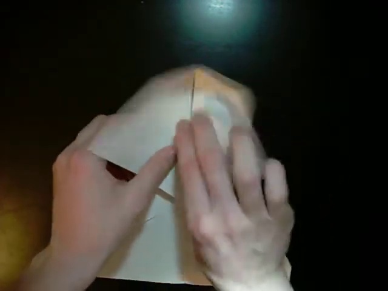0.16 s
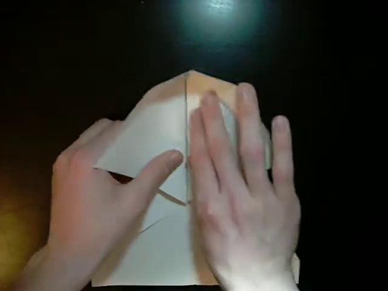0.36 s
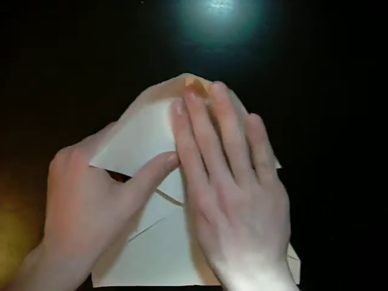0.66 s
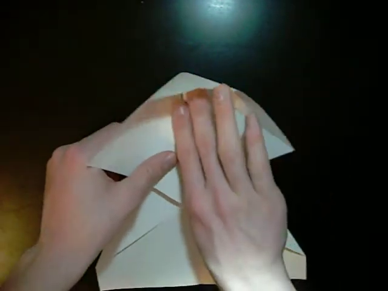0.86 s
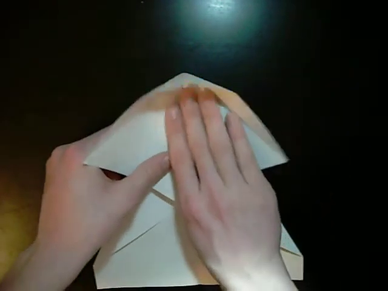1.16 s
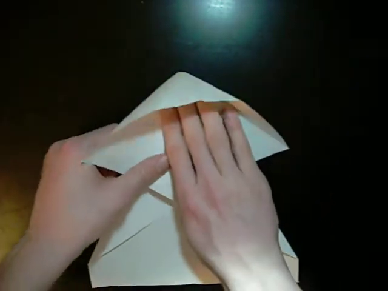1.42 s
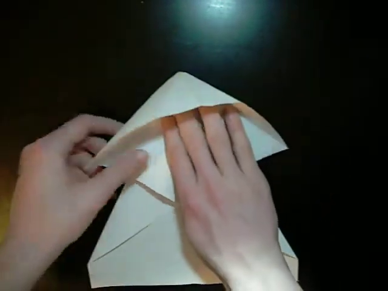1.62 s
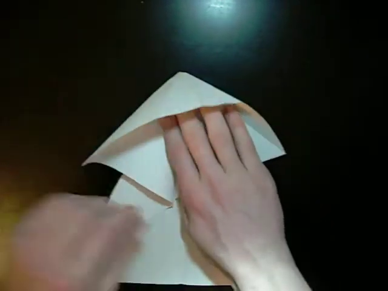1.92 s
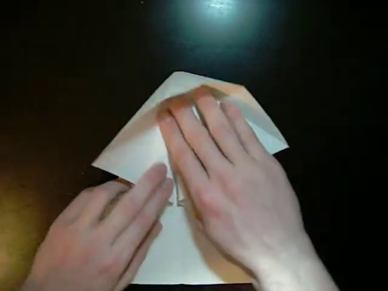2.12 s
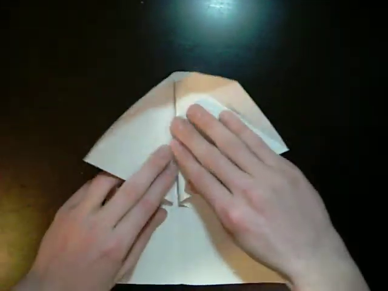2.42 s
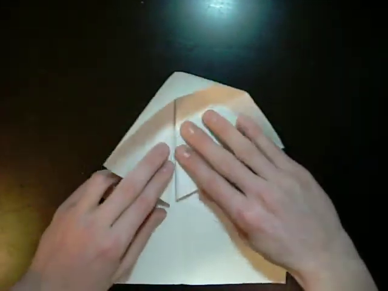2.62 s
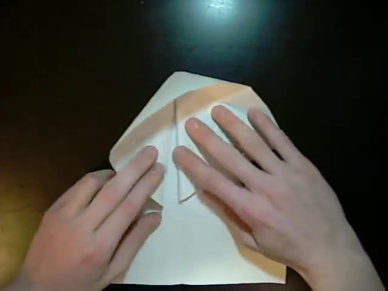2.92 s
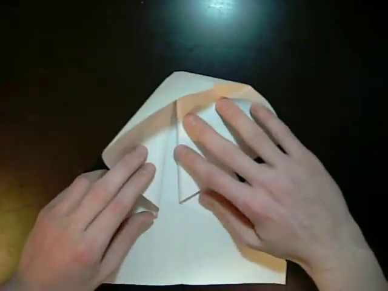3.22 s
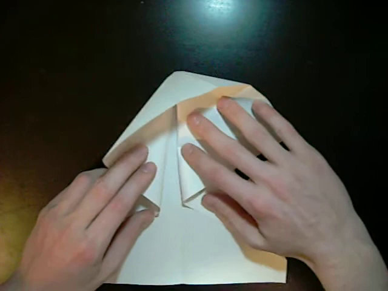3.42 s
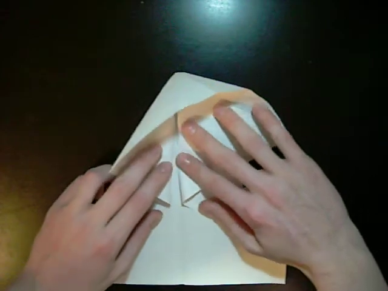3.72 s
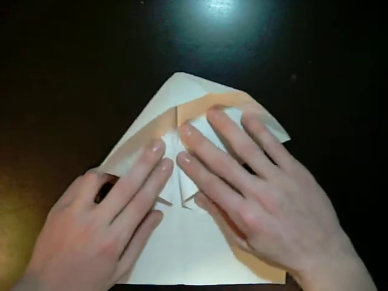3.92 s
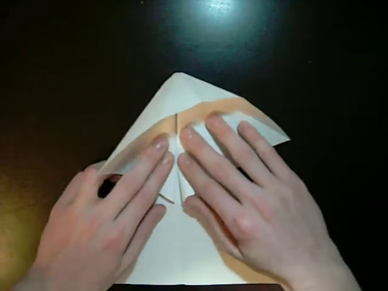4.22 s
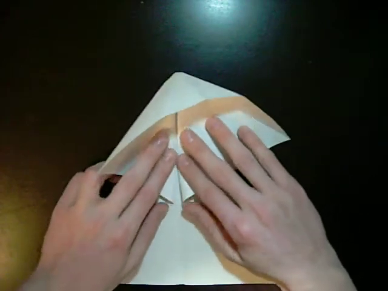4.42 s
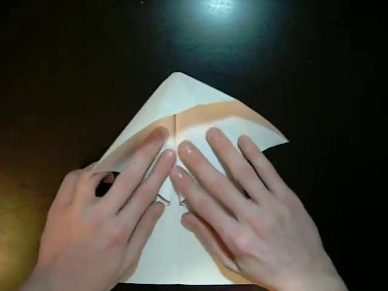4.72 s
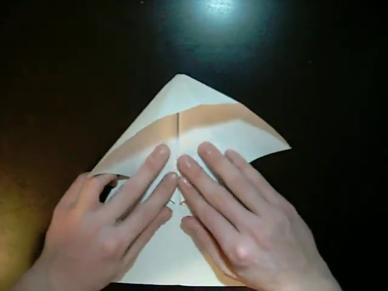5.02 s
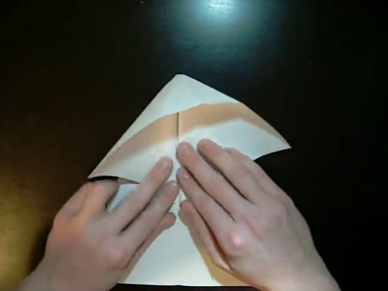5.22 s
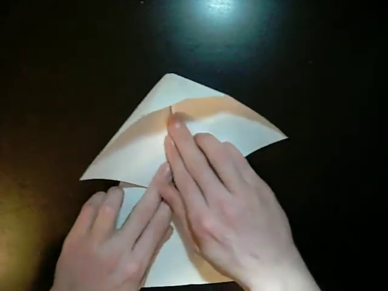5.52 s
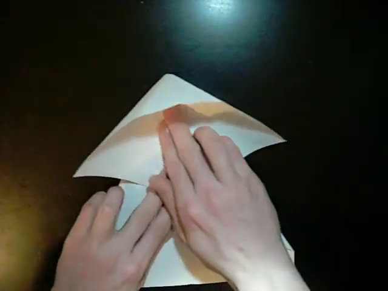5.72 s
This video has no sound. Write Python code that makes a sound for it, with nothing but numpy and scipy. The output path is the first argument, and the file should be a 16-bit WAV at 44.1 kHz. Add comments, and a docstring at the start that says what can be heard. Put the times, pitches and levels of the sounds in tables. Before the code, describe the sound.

A stiff sheet is folded on a desk: brief rustling rubs, skidding flaps, and bright crease clicks with slight ringing. The loudest pair of snaps comes about a quarter of the way in, clipping harshly with a small thump; another sharp cluster comes two thirds through. Between them are faint finger strokes. Dry small room, close low-quality microphone lacking high treble, faint hum and buzz beneath.

```python
"""At a desk in a small room, two hands fold a sheet of paper close to a narrow-band webcam microphone.
Sliding fingers and paper layers hiss: dense random stick-slip clicks, coloured and shaped by each stroke.
Flaps scuff in short swells of such clicks; creases buckle in sharp snaps, each a click, a bounce and a ring.
Decaying low modes pat the desk and one puff of air thumps; the hardest snaps overload the microphone.
A faint hiss, mains hum and frame-rate buzz lie under everything."""
import sys
import numpy as np
from scipy import signal
from scipy.fft import rfft, irfft, next_fast_len
from scipy.io import wavfile

SR = 44100
rng = np.random.default_rng(int(sys.argv[2]) if len(sys.argv) > 2 else 0)


def store_wav(level_fs):
    """Save 16-bit WAV to argv[1]."""
    pcm = np.round(np.clip(np.atleast_2d(level_fs), -1, 1) * 32767)
    wavfile.write(sys.argv[1], SR, pcm.T.astype(np.int16))


N = 258426  # length of the scene in samples

# spectrum of the fine hiss of sliding paper: frequency_hz [Hz], density_db [relative dB per Hz]
HISS_SPECTRUM = [(500, -30.5), (900, -29.5), (1300, -16.5), (1700, -10), (2200, -6), (2900, 1.5),
                 (3700, 2.5), (4100, -0.5), (4500, -6.5), (5200, -25), (7000, -71)]
# spectrum of the sheet's body shaken by the rub: frequency_hz [Hz], density_db [relative dB per Hz]
BODY_SPECTRUM = [(120, -16.5), (250, -14.5), (480, -2), (700, -4), (1100, -2.5), (1400, 4.5), (2200, 0.5),
                 (4000, -20.5)]
HISS_DB, TICKS_DB, BODY_DB = -1.5, -16, 0.5  # balance of the three parts


def rubbing():
    """Stick-slip friction: dense slips and sparse ticks of catching fibres flutter under uneven pressure."""
    rub, shake = sliding()

    hiss = unit(colour(slips(N, per_s=7000, spread_db=2.0), HISS_SPECTRUM))
    ticks = unit(colour(slips(N, per_s=190, spread_db=0.5), SNAP_SPECTRUM))
    body = unit(colour(slips(N, per_s=6300, spread_db=2.0), BODY_SPECTRUM))

    surface = rub * (amp(HISS_DB) * hiss + amp(TICKS_DB) * ticks)
    pressure = wander(hz=147.8, depth_db=2.05)
    return (surface + shake * amp(BODY_DB) * body) * pressure


# strokes of fingers and paper layers sliding: start_s [s], length_s [s], level_db [dB],
# body_db [dB relative to the level, body of the sheet, mostly 0.5 to 2.5 kHz]
SLIDING_STROKES = [(-0.015, 0.03, -23.5, -15.5), (0.083, 0.14, -37, -12), (0.252, .032, -36, -8.5),
                   (0.29, 0.086, -34.5, -13), (0.404, .03, -32, -20), (0.446, 0.056, -41, -12.5),
                   (0.51, 0.055, -31.5, -12.5), (0.636, 0.021, -35.5, -20), (0.694, 0.0303, -42, -20),
                   (0.919, 0.057, -40.5, 4), (0.99, 0.022, -34.5, -21), (1.132, 0.065, -37.5, -12.5),
                   (1.202, 0.092, -41, -16), (1.38, .09, -34, -19.5), (1.516, 0.14, -33, -21),
                   (1.671, 0.052, -39, -19), (1.706, 0.047, -36.5, -13.5), (1.773, 0.018, -38.5, -12.5),
                   (1.83, .022, -44, -15.5), (1.884, 0.056, -43, -12), (1.957, 0.13, -36.5, -15.5),
                   (2.085, 0.12, -38, -19.5), (2.198, 0.22, -41, -15.5), (2.43, 0.13, -38.5, -14.5),
                   (2.569, 0.054, -44.5, -11), (2.647, 0.064, -36.5, -21), (2.772, 0.19, -38.5, -12.5),
                   (2.996, 0.066, -38.5, -17), (3.273, 0.085, -41.5, -36), (3.452, 0.081, -44.5, -22),
                   (3.496, 0.098, -36, -15.5), (3.587, 0.14, -45, -9), (3.743, 0.12, -44, -18),
                   (3.886, 0.047, -42.5, -29), (3.968, 0.072, -37, -6), (4.145, 0.072, -38, -31),
                   (4.213, 0.084, -34.5, -20), (4.442, 0.11, -36.5, -16), (4.599, 0.11, -42.5, -16),
                   (4.707, 0.25, -37, -31), (5.097, 0.14, -39, -26.5), (5.251, 0.25, -38, -20),
                   (5.522, 0.21, -38.5, -27.5), (5.742, 0.158, -38.5, -16.5)]
# hands resting and shifting on the sheet between strokes: time_s [s], level_db [dB]
RESTING_HANDS = [(0, -51), (.5, -46.5), (.85, -58), (1.05, -49), (1.6, -43), (1.87, -64), (2.1, -46.5),
                 (2.8, -44), (3.2, -57), (3.42, -59.5), (4.1, -43.5), (4.4, -47), (5, -49), (5.8, -43)]
RESTING_BODY_DB = -15.5  # relative to the resting level


def sliding():
    """Incoherent addition: strokes and resting hands add in power, for the rub and for the sheet's body."""
    t = np.arange(N) / SR
    rub_power = amp(np.interp(t, *np.transpose(RESTING_HANDS))) ** 2
    body_power = rub_power * amp(RESTING_BODY_DB) ** 2
    for start, length, level_db, body_db in SLIDING_STROKES:
        power = (amp(level_db) * stroke(start, length)) ** 2
        rub_power = rub_power + power
        body_power = body_power + power * amp(body_db) ** 2
    return np.sqrt(rub_power), np.sqrt(body_power)


GRIP_S, RELEASE_S = 0.013, 0.012  # rise time, and time constant of the dying away
ARCH_DB = 4  # rise from the slow ends of a stroke to its fast middle


def stroke(start, length):
    """Friction loudness follows hand speed: a quick grip, loudest halfway, dying away as the hand stops."""
    age = np.arange(N) / SR - start
    grip = np.clip(age / GRIP_S, 0, 1)
    speed = np.sin(np.pi * np.clip(age / length, 0, 1))
    release = np.exp(-np.maximum(age - length, 0) / RELEASE_S)
    return grip * amp(ARCH_DB * (speed - 1)) * release


# creases buckling, the big ones in quick cascades: start_s [s], peak_db [dB], low_db [dB, low part],
# top_db [dB, top part], pitch_hz [Hz, ring of the buckled facet]
BUCKLING_SNAPS = [(0.1983, -9.5, -11, -10, 2500), (0.4051, -20.5, 3, 0.5, 2340),
                  (0.648, -24.5, 3.5, -2.5, 2450), (0.8192, -24.5, 4.5, 9.5, 2260),
                  (0.889, -26.5, 6, 4, 2250), (0.9343, -9.5, 5, 1.5, 1320), (0.9535, -12, -6, -13, 1600),
                  (1.302, -22.5, -2, -15, 1300), (1.378, -1, -1, -1, 2450), (1.3794, -2, -0.5, -3.5, 2460),
                  (1.3807, -2.5, -3, 4.5, 2300), (1.3906, -10, -11, 3.5, 2420),
                  (1.4002, -15.5, -19, 4, 2280), (1.5113, -19, -3.5, 7.5, 2620), (1.5803, -1, 4.5, 4, 1640),
                  (1.582, -2, 1, 2.5, 1654), (1.72, -24.5, -11, -10, 2520), (2.0402, -16, -6, -2, 2340),
                  (2.5187, -27, 6.5, -17, 1010), (2.8939, -17, -4.5, -0.5, 2410),
                  (3.0031, -29, 3.5, 10, 2550), (3.2906, -27.5, -1, 19, 1790), (3.387, -32, 9, 4.5, 2500),
                  (3.6543, -6.5, -1, 8, 1610), (3.9695, -3.5, 1, 8, 2074), (3.973, -7.5, -1.5, 2, 2040),
                  (4.0113, -6, -4, 5, 2030), (4.0415, -17, 3.5, 4.5, 2060), (4.4964, -16, 3, 0.5, 2640),
                  (4.6053, -33, 20, 6.5, 2070), (5.6939, -15.5, -0.5, -2.5, 2050),
                  (5.7622, -22, -1.5, 0, 1720), (5.7904, -19.5, 5.5, -22, 1970),
                  (5.8305, -19.5, 7, 5, 2600)]
# spectrum of a buckling crease, shared by ticks and scuffs: frequency_hz [Hz], density_db [relative dB per Hz]
SNAP_SPECTRUM = [(60, -32.5), (200, -23.5), (450, -16.5), (700, -13.5), (1100, -8), (1600, 1.5), (2400, 0),
                 (3200, 6.5), (4300, -1.5), (5000, -13), (7000, -62.5)]
FLUTTER_T60_S, BOUNCE_S = 0.025, .0023
CREASE_HZ = 2990  # the stiff crease itself rings alike in every snap


def snap(start, peak_db, low_db, top_db, facet_hz):
    """Snap-through buckling: a click, its bounce off the desk, a dying flutter, and facet and crease ringing."""
    lead, size = 256, 4096  # samples; the lead leaves room for the filter's pre-ringing
    t = np.arange(size - lead) / SR

    kick = 0.11 * rng.choice([-1, 1], len(t)) * amp(-60 * t / FLUTTER_T60_S)
    kick[0] += .85
    bounce = round(BOUNCE_S * rng.uniform(.85, 1.15) * SR)
    kick[bounce] += .22

    sound = colour(np.pad(kick, (lead, 0)), SNAP_SPECTRUM, tilt(low_db, top_db))
    sound = resonance(sound, facet_hz, width_hz=78, gain_db=7.5)
    sound = resonance(sound, CREASE_HZ, width_hz=100, gain_db=2.5)
    peak = abs(colour(sheet(sound), MICROPHONE_BAND)).max()  # as it reaches the microphone
    return start - lead / SR, amp(peak_db) * sound / peak


# flaps and fingertips skidding: middle_s [s], level_db [dB], length_s [s], low_db [dB, low part]
SKIDS = [(0.132, -25, 0.021, -12), (0.1367, -16, .005, -4), (0.151, -12, 0.012, 3),
         (0.172, -24.5, 0.022, 9.5), (0.21, -36.5, 0.017, 20.5), (.835, -27.5, 0.0029, -43),
         (.897, -38.5, 0.0045, -4), (0.931, -28.5, 0.011, -1.5), (0.948, -32.5, 0.024, 13.5),
         (0.966, -28, 0.0056, 9), (1.406, -24.5, 0.0086, -18), (1.449, -32.5, 0.0072, 7),
         (1.462, -26, 0.0054, 4), (1.602, -35, 0.0125, 13), (4.006, -24, 0.014, -1),
         (4.115, -33, 0.0098, -7.5), (5.691, -32, 0.0068, -5)]


def scuff(middle, level_db, length, low_db):
    """Brief sliding friction: a quick skid is a swell of slips that shakes the whole sheet."""
    t = np.arange(-3000, 3000) / SR
    swell = np.exp(-(1.3 * t / length) ** 2)
    burst = slips(len(t), per_s=6000, spread_db=0.5) * swell
    burst = unit(colour(burst, SNAP_SPECTRUM, tilt(low_db, -1.2)))
    return middle + t[0], amp(level_db) * burst * np.sqrt(np.mean(swell ** 2))


# the sheet patting the desk: start_s [s], level_db [dB], pitch_hz [Hz]
DESK_PATS = [(0.148, -43, 319), (0.954, -58, 260), (1.384, -40, 451), (2.044, -55, 170.6), (2.52, -57, 334),
             (2.901, -50, 487), (3.67, -42.5, 474), (3.68, -43.5, 175), (3.972, -48.5, 183),
             (5.695, -43, 456)]


def pat(start, level_db, hz, t60=.14):
    """Damped modes: the pressed sheet knocks softly in a main mode and a weaker, shorter one above it."""
    t = np.arange(SR // 4) / SR
    decay = amp(-60 * t / t60)
    main = decay * np.sin(2 * np.pi * hz * t)
    upper = amp(-4.5) * decay ** 2 * np.sin(2 * np.pi * 1.37 * hz * t)
    soft_onset = 1 - np.exp(-t / 0.0046)
    return start, amp(level_db) * (main + upper) * soft_onset


# air pushed out as the big flap pops over: middle_s [s], peak_db [dB], half_width_s [s]
FLAP_PUFF = (1.3795, -20, 0.00066)


def puff(middle, peak_db, half_width):
    """Displaced air: one short pressure pulse, heard as a thump."""
    age = np.arange(N) / SR - middle
    return amp(peak_db) * np.exp(-(age / half_width) ** 2)


# resonances of the folded sheet over the desk: pitch_hz [Hz], width_hz [Hz], gain_db [dB]
SHEET_RESONANCES = [(1030, 33, 5), (1200, 36, 1), (1260, 60, 0.9), (1790, 120, 2), (1874, 100, -3.5),
                    (2093, 50, 4.5), (2434, 160, 5.5), (2500, 147, -1.5), (3260, 320, 2.5), (3400, 100, -4)]


def sheet(x):
    """Resonant filtering: rubs, scuffs and snaps all pass the sheet's resonances."""
    for row in SHEET_RESONANCES:
        x = resonance(x, *row)
    return x


# decay time of the room: frequency_hz [Hz], t60_s [s]
ROOM_DECAY = [(150, 0.18), (500, 0.26), (1500, 0.16), (4000, 0.042)]


def room(x):
    """Diffuse reverberation: sparse random echoes from the nearby walls, each band dying at its own speed."""
    t = np.arange(SR // 2) / SR
    echoes = rng.choice([-1., 1.], len(t)) * (rng.random(len(t)) < 3000 / SR)
    echoes = echoes * (t > .005)
    hz, age, bands = signal.stft(echoes, SR, nperseg=256)
    decay = amp(-60 * age / read(ROOM_DECAY, hz)[:, None])
    tail = signal.istft(bands * decay, SR, nperseg=256)[1]
    return signal.fftconvolve(x, tail / np.linalg.norm(tail))[:N]


# spectrum of the steady hiss: frequency_hz [Hz], density_db [relative dB per Hz]
FLOOR_SPECTRUM = [(20, 3), (45, -2.5), (80, -0.5), (130, -6), (250, -8), (400, -10.5), (800, -10.5),
                  (2000, -11), (4200, -14.5)]
FLOOR_DB, MAINS_DB = -56, -60.5  # rms before the microphone
MAINS_HZ, FRAME_HZ = 60, 30


def background():
    """Electrical interference: steady hiss, mains hum, and a buzz as the supply current dips every frame."""
    t = np.arange(N) / SR - .0208
    dip = -1.0 * (t % (1 / FRAME_HZ) < .0064)
    buzz = amp(-46.5) * signal.lfilter(*signal.butter(2, 75, "high", fs=SR), dip)
    mains = -amp(MAINS_DB) * np.sqrt(2) * np.cos(2 * np.pi * MAINS_HZ * t)
    hiss = unit(colour(rng.standard_normal(N), FLOOR_SPECTRUM, MICROPHONE_BAND))
    return buzz + mains + amp(FLOOR_DB) * hiss


def slips(size, per_s, spread_db):
    """Stick-slip: tiny releases of paper fibres are random clicks, a few larger than the rest."""
    excess_db = spread_db * np.minimum(rng.exponential(1, size), 4)
    sizes = amp(excess_db) * rng.choice([-1, 1], size)
    return unit(sizes * (rng.random(size) < per_s / SR))


def wander(hz, depth_db):
    """Random modulation: a gain gliding between random values drawn hz times a second."""
    knots = np.arange(N) * hz / SR
    return amp(depth_db * np.interp(knots, np.arange(4000), rng.standard_normal(4000)))


def tilt(low_db, top_db):
    """Spectral tilt with tension: slack spots of the sheet are dull, taut ones bright."""
    return [(1000, low_db), (2200, 0.017), (3600, top_db)]


def resonance(x, hz, width_hz, gain_db):
    """Resonance: lifts or lowers a narrow band; a lifted band rings on after a click."""
    band = signal.lfilter(*signal.iirpeak(hz, hz / width_hz, fs=SR), x)
    return x + (amp(gain_db) - 1) * band


def colour(x, *spectra):
    """Linear filtering: shapes x by the sum of spectra given in dB."""
    size = next_fast_len(len(x) + 2048)
    hz = np.fft.rfftfreq(size, 1 / SR)
    gain = amp(sum(read(s, hz) for s in spectra))
    return irfft(rfft(x, size) * gain, size)[:len(x)]


def read(points, hz):
    """Logarithmic pitch scale: reads a table on a log-frequency axis."""
    f, value = np.transpose(points)
    return np.interp(np.log(hz + 1), np.log(f), value)


def amp(db):
    """Decibel scale: decibels to amplitude gain."""
    return 10 ** (np.asarray(db) / 20)


def unit(x):
    """Normalisation: scales to rms 1."""
    return x / np.sqrt(np.mean(x ** 2) + 1e-20)


def add(mix, start_s, sound):
    """Superposition: adds a sound to the mix from start_s on."""
    start = round(start_s * SR)
    sound = sound[max(-start, 0):]
    part = mix[max(start, 0):][:len(sound)]
    part += sound[:len(part)]


def scene():
    """Superposition: the sheet's sounds and their room tail over the electrical background."""
    paper = rubbing()
    for row in SKIDS:
        add(paper, *scuff(*row))
    for row in BUCKLING_SNAPS:
        add(paper, *snap(*row))
    paper = sheet(paper) + puff(*FLAP_PUFF)
    for row in DESK_PATS:
        add(paper, *pat(*row))
    return (paper + amp(-19.0) * room(paper) + background())[None]


# response of the narrow-band microphone: frequency_hz [Hz], gain_db [dB]
MICROPHONE_BAND = [(3900, -1.5), (4150, -7), (4300, -14), (4450, -24.5), (4600, -40), (4800, -72),
                   (5200, -100)]
FULL_SCALE = .71  # amplitude at which the microphone overloads
EDGE_HZ = 16900  # low-pass edge after the overload


def record(dry):
    """Band limiting, then overload: little passes above 4.3 kHz, and the hardest snaps are flattened."""
    heard = colour(dry[0], MICROPHONE_BAND)
    heard = heard * signal.windows.tukey(N, .001)  # very short fades at both ends
    clipped = np.clip(heard, -FULL_SCALE, FULL_SCALE)
    low_pass = signal.firwin(511, EDGE_HZ, window=("kaiser", 9), fs=SR)
    return signal.oaconvolve(clipped, low_pass, "same")[None]


dry = scene()
out = record(dry)
store_wav(out)
```